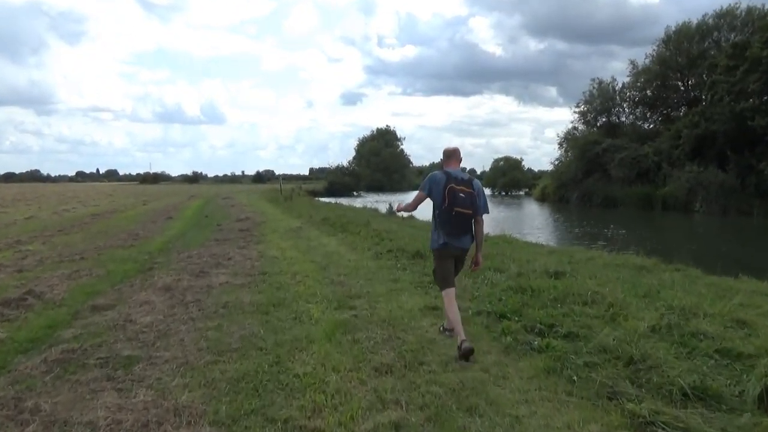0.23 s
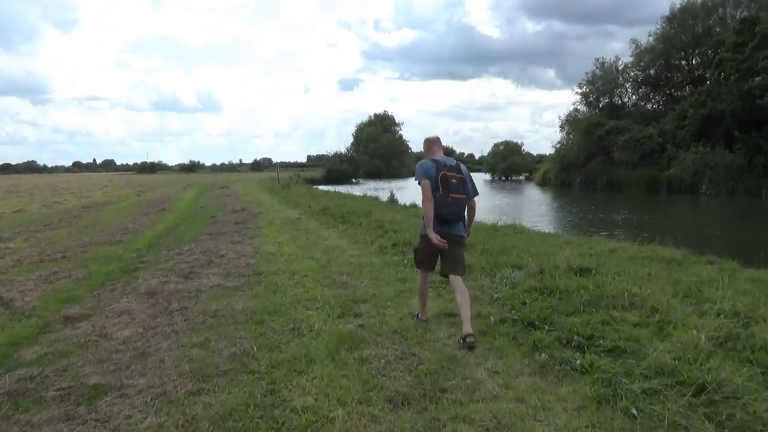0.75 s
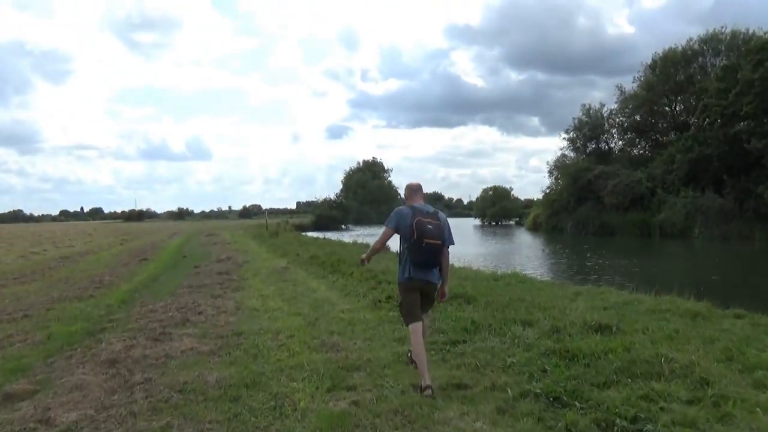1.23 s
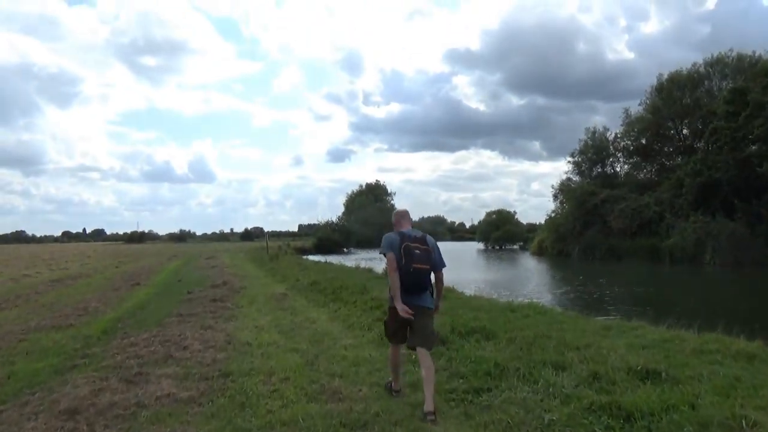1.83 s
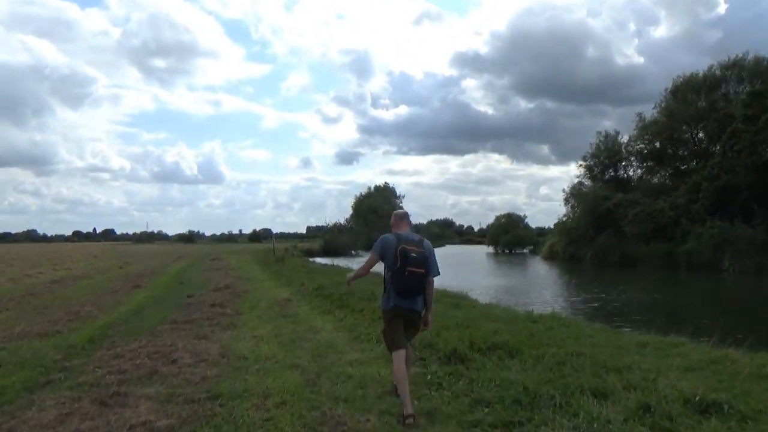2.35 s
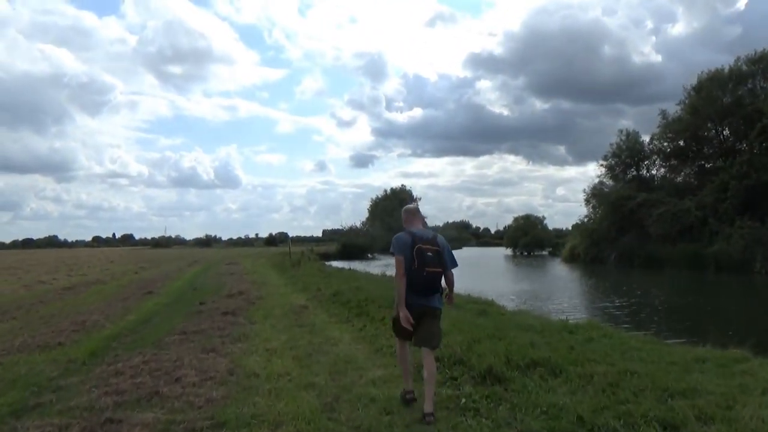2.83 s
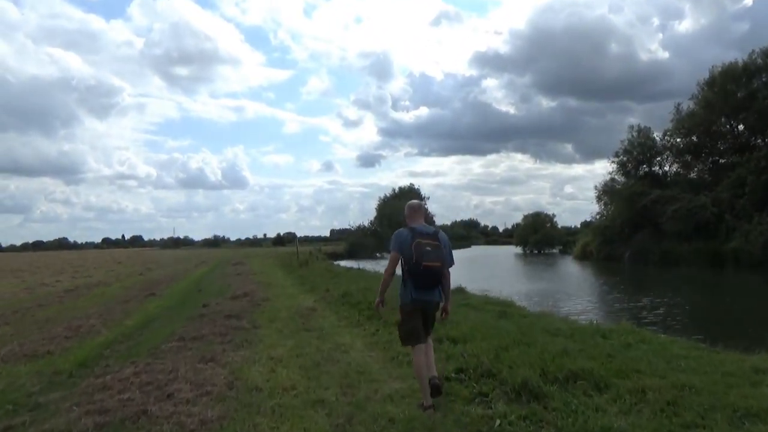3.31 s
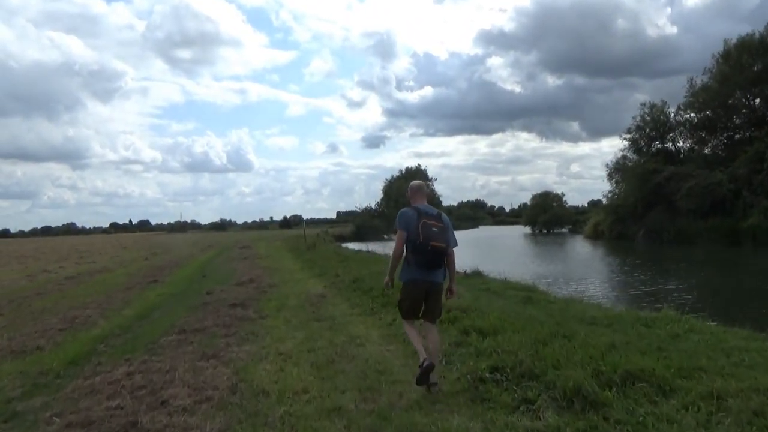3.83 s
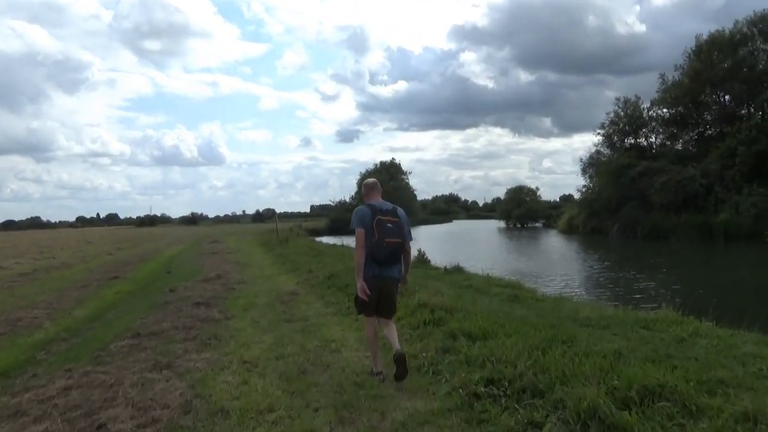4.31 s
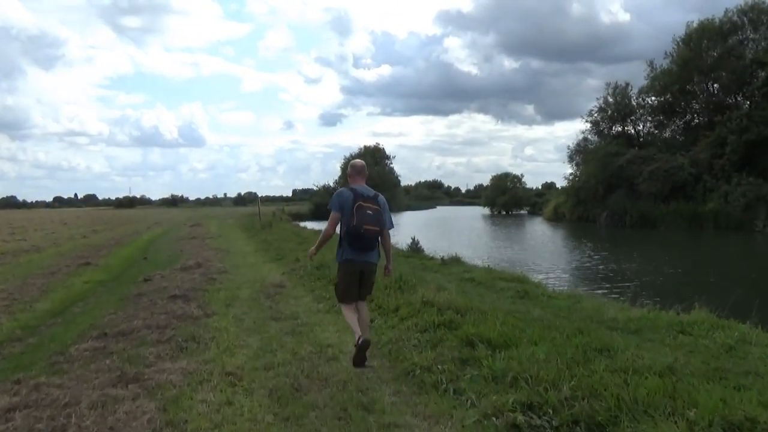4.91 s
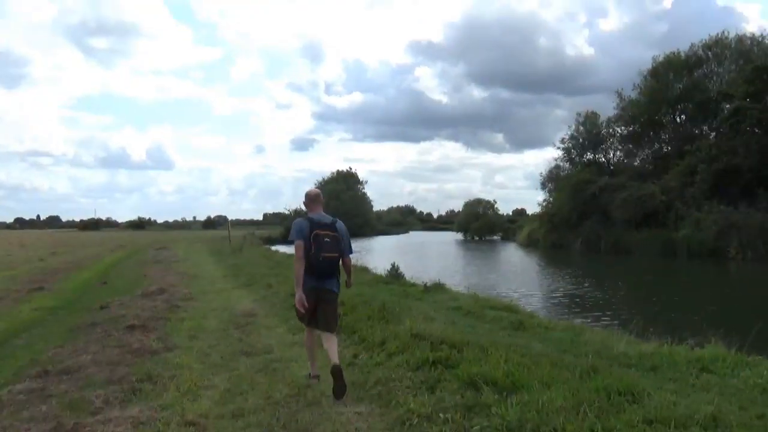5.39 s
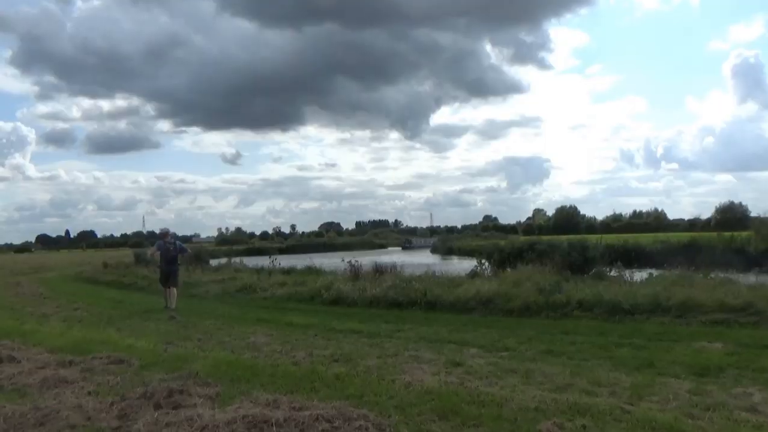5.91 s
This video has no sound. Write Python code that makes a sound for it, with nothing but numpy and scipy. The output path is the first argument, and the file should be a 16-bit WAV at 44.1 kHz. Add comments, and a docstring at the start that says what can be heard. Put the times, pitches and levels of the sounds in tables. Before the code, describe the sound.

Close, steady walking through grass, with soft thuds and dry little cracks, while wind hisses faintly far away.

```python
"""A grassy riverbank, heard from a hand-held camera microphone carried along behind another walker.
Straight below, each leg swing brushes countless blades; tufts whip the shoe, dry stalks snap and soles
thud on the turf. Sandals and gear knock, a strap buckle clacks right by the microphone, and midway there
is one faint, short high squeak. Far off, wind hisses in the trees and over the field. Near the end the
sound dips briefly to silence and returns with a gust buffeting the microphone."""
import sys
import numpy as np
from scipy import signal
from scipy.fft import rfft, irfft, next_fast_len
from scipy.io import wavfile
from scipy.ndimage import uniform_filter1d

SR = 44100
rng = np.random.default_rng(int(sys.argv[2]) if len(sys.argv) > 2 else 0)


def pcm_store(signal):
    """Save signal as 16-bit PCM."""
    levels = np.round(np.clip(np.atleast_2d(signal), -1, 1) * 32767)
    wavfile.write(sys.argv[1], SR, levels.astype(np.int16).T)


N = 271215
TIME = np.arange(N) / SR

# Tone of brushed blades, heard from hand height: frequency_hz, gain_db
BLADE_SPECTRUM = [(200, -44), (1500, -15), (3000, -11.5), (4500, -9), (6000, -6), (7500, -1.5), (9600, 4),
                  (11000, 0), (12500, -6), (14000, -10.5), (16000, -16.5)]
# Leg swings below the microphone: start_s, length_s, level_db, growth_db, stems_relative_db
LEG_SWINGS = [(-.1, 0.13, -34.5, -2.5, -7.5), (0.266, .2, -30, 5, -9.5), (0.617, 0.48, -43, 4, -9),
              (1.328, 0.31, -39.5, 3.5, -18), (1.889, .29, -37.5, -3, -11.5), (2.415, 0.35, -42, -1, -15),
              (3.03, 0.28, -40, -0.5, -12), (3.63, 0.2, -39.5, -4, -15), (4.057, 0.377, -40.5, 4, -16),
              (4.669, 0.28, -38.5, -2.5, -12), (5.213, 0.12, -36, -4, -11.5), (5.406, 0.13, -38, 0, -10),
              (5.775, 0.16, -34.5, 1.5, -11.5), (6.056, .1, -43.5, 0, -2.5)]
SWING_ATTACK_S, SWING_RELEASE_S = 0.034, 0.041
RUSTLE_DB = -48  # grass round the standing foot, between swings


def grass():
    """Blades flick off the shoe; the faster the sweep, the more of them and the smoother the sound."""
    power = undb(RUSTLE_DB) ** 2 + sum(sweep(*swing) ** 2 for *swing, _ in LEG_SWINGS)
    brush = np.sqrt(power) * undb(0.5 * wander(22))
    share = np.clip(0.3 * brush / undb(-37), .02, 1)
    flicks = unit(crackle(share, spread_db=2.1) / np.sqrt(share))  # same power at any density
    rub = undb(-7) * rng.standard_normal(N)
    dry_ticks = undb(-10.5) * crackle(.004, spread_db=2)  # drier blades stand out of the swish
    catching = undb((1.5 - .5 * share) * (wander(70) + 1.04 * wander(300)))
    return unit(colour(flicks + rub + dry_ticks, BLADE_SPECTRUM)) * catching * brush


def sweep(start_s, length_s, level_db, growth_db):
    """How hard a swinging foot brushes the grass: it enters, gains or loses speed, and comes to rest."""
    progress = np.clip((TIME - start_s) / length_s, 0, 1) - .5
    envelope = swell(start_s, length_s, SWING_ATTACK_S, SWING_RELEASE_S)
    return undb(level_db + growth_db * progress) * envelope


# Short high sounds: a faint squeak at 3.435 s, the rest tufts down at the shoe:
# middle_s, level_db, half_length_s, pitch_hz
HIGH_BURSTS = [(0.823, -34, 0.018, 9050), (1.078, -30.5, 0.012, 9400), (1.62, -38.5, 0.016, 9000),
               (1.817, -42, .014, 9500), (2.056, -31.5, 0.02, 9000), (2.38, -42, 0.013, 9500),
               (2.602, -35.5, 0.013, 8400), (3.125, -35, .024, 9050), (3.285, -39, .016, 9200),
               (3.435, -44, .012, 7000), (4.358, -31, 0.014, 9300), (4.773, -27, 0.014, 9700),
               (5.232, -25, 0.0025, 10700), (5.259, -22.5, 0.0047, 8700), (5.487, -34.5, 0.014, 9600),
               (5.915, -30.5, 0.012, 9200)]


def tufts_and_squeak():
    """Bursts of band-passed clicks: bright rasps as tufts let go of the shoe, and one faint squeak."""
    out, clicks = np.zeros(N), crackle(0.39, spread_db=1.5)
    for middle_s, level_db, half_length_s, pitch_hz in HIGH_BURSTS:
        band = unit(resonate(resonate(clicks, pitch_hz, q=0.92), pitch_hz, q=3.0))
        out += band * undb(level_db) * bump(middle_s, half_length_s)
    return out


# Dry stalks snapping underfoot, sharp at this close range: start_s, peak_db
STALK_SNAPS = [(.301, -14), (0.542, -22), (.835, -11), (2.006, -17), (2.051, -14), (2.1312, -10),
               (2.739, -5), (4.133, -12.5), (4.364, -13), (4.750, -11), (5.8666, -9)]


def stalks():
    """A stalk breaks in one crack a fraction of a millisecond long, with a faint tail."""
    out = np.zeros(N)
    for start_s, peak_db in STALK_SNAPS:
        crack = resonate(contact(tail_db=-24, decay_s=0.0012), 9700, q=2.7)
        add(out, start_s, resonate(crack, 8300, q=0.56), peak_db)
    return out


# Tone of stems crushed into the bank: frequency_hz, gain_db
STEM_SPECTRUM = [(80, -36), (200, -1), (370, 1.5), (700, -2), (1100, 0), (1900, 0), (3000, -4),
                 (4500, -5.5), (8000, -7.5), (15000, -32)]
# Heels and soles landing below the microphone: start_s, thud_peak_db, pitch_hz, crunch_db
FOOTSTEPS = [(0.039, -30.5, 540, -48), (.229, -32, 416, -50), (0.286, -33.5, 400, -46),
             (0.454, -29.5, 415, -45), (0.803, -31, 550, -42.5), (1.085, -31.5, 300, -39.5),
             (1.29, -35.5, 400, -46.5), (1.479, -36, 260, -49), (1.62, -41, 498, -42),
             (1.785, -37, 300, -50), (2.049, -44, 600, -40.5), (2.144, -33, 557, -49),
             (2.259, -35.5, 240, -50), (2.377, -31.5, 460, -54), (2.593, -32.5, 374, -42.5),
             (2.742, -34.5, 288, -47), (2.9, -41, 600, -47.5), (3.268, -35, 795, -43.5),
             (3.356, -26.5, 440, -52), (3.69, -38, 528, -46.5), (3.79, -40, 528, -51),
             (4.346, -33, 560, -45.5), (4.388, -31, 670, -55), (4.78, -41.5, 434, -39),
             (5.119, -32.5, 360, -68), (5.432, -37.5, 380.4, -49.5), (5.915, -35, 290, -39.5)]
CRUNCH_BUILD_S, CRUNCH_SETTLE_S = 0.021, 0.026  # stems give before the sole is down, then settle
STANDING_DB = -51  # stems creaking under the standing foot


def turf():
    """Soft ground gives short thuds; matted stems crunch under the weight and clods patter."""
    thuds = np.zeros(N)
    power = undb(STANDING_DB) ** 2
    power += sum((undb(stems_db) * sweep(*swing)) ** 2 for *swing, stems_db in LEG_SWINGS)
    for start_s, peak_db, pitch_hz, crunch_db in FOOTSTEPS:
        thud = resonate(contact(tail_db=-15.5, decay_s=0.007), pitch_hz, q=1.4)
        add(thuds, start_s, resonate(thud, pitch_hz, q=0.84), peak_db)
        press = bump(start_s, np.where(TIME < start_s, CRUNCH_BUILD_S, CRUNCH_SETTLE_S))
        power += (undb(crunch_db) * press) ** 2
    stems = colour(crackle(.25, spread_db=2.5), STEM_SPECTRUM)
    clod_spectrum = [(80, -25), (220, 3), (500, 4), (900, 2), (2000, -10.5), (6000, -40)]
    patter = colour(crackle(.002, spread_db=2.5), clod_spectrum)
    crunch = unit(stems) * np.sqrt(power) * undb(2.17 * wander(120))
    return thuds + crunch + unit(patter) * undb(-53)


# Sandals and carried gear, near the microphone: start_s, peak_db, pitch_hz
GEAR_KNOCKS = [(.002, -19.5, 1030), (.117, -31, 700), (.078, -31, 2500), (0.2248, -26, 1100),
               (.286, -30, 910), (.631, -25, 2750), (0.7877, -24, 1910), (1.014, -31, 700),
               (1.886, -23.5, 2000), (2.619, -26.5, 2900), (2.739, -28.5, 790), (2.962, -28, 1090),
               (3.683, -28, 4600), (4.058, -31, 1500), (5.202, -23, 1850), (5.464, -23, 4800),
               (5.923, -23, 3400)]


def gear():
    """Sandals and gear bump in small dull knocks that die at once."""
    out = np.zeros(N)
    for start_s, peak_db, pitch_hz in GEAR_KNOCKS:
        knock = resonate(contact(tail_db=-17, decay_s=0.0018), pitch_hz, q=1.44)
        add(out, start_s, resonate(knock, pitch_hz, q=0.83), peak_db)
    return out


# Ring of the strap buckle: pitch_hz, relative_db, t60_s
BUCKLE_MODES = [(1000, -3.5, 0.029), (1170, 5, 0.012), (1875, 1.5, 0.013), (2280, 3.5, 0.011),
                (2820, 3.5, 0.011), (3560, -3, 0.009), (5140, -10, .008)]
# Its clack and rebounds, right by the microphone: start_s, relative_db
BUCKLE_HITS = [(5.3753, -18.5), (5.3765, -16), (5.3798, -20.5)]


def buckle():
    """A buckle rings so close that each microphone port hears it in a different phase."""
    ports, t = np.zeros((2, N)), TIME[:4096]
    for port, sign in zip(ports, (-1, 1)):
        ring = np.zeros(len(t))
        for pitch_hz, relative_db, t60_s in BUCKLE_MODES:
            phase = sign * min(pitch_hz / 3600, .6)
            ring += undb(relative_db - 60 * t / t60_s) * np.sin(2 * np.pi * pitch_hz * t + phase)
        for start_s, relative_db in BUCKLE_HITS:
            add(port, start_s, ring, relative_db + 7.5)
    bass_cut = [(60, -18), (400, -5), (900, 0), (8000, 0)]
    return np.array([colour(port, bass_cut) for port in ports])


# Gusts right on the microphone: start_s, length_s, level_db
MIC_GUSTS = [(0.427, 0.037, -46), (3.59, .08, -51), (4.208, 0.055, -52), (4.398, 0.098, -49),
             (4.637, 0.068, -47.5), (4.886, 0.05, -51), (5.315, 0.056, -45.5), (5.46, .15, -50.5),
             (5.995, .17, -28)]
GUST_ATTACK_S, GUST_RELEASE_S, BREEZE_DB = 0.021, 0.033, -63.5


def wind_buffet():
    """Eddies rumble on the microphone ports; a strong gust reaches higher in pitch and sounds wider."""
    wind = undb(BREEZE_DB)
    for start_s, length_s, level_db in MIC_GUSTS:
        wind += undb(level_db) * swell(start_s, length_s, GUST_ATTACK_S, GUST_RELEASE_S)
    strength = np.clip((20 * np.log10(wind) + 50) / 24, 0, 1)
    eddies = []
    for _ in range(2):
        slow = noise([(20, -9.5), (45, -9), (80, -5.5), (150, -21), (400, -39), (2000, -77)])
        fast = noise([(20, -13), (70, 0), (195, -1), (320, -14), (600, -26.5), (3000, -56)])
        eddies.append(np.sqrt(1 - strength) * slow + np.sqrt(strength) * fast)
    mid, side = eddies
    # small eddies are narrower than the gap between the ports
    side = colour(side, [(50, -18), (150, -8), (350, -4)]) * undb(7 * (strength - 0.5))
    return stereo(mid, side) * wind


# Tone of the open air, far beyond the bank: frequency_hz, gain_db
AIR_SPECTRUM = [(15, -9), (30, 3), (60, 4), (170, 0.5), (350, -2.5), (720, 2), (1200, -4.5), (1800, -7.5),
                (3000, -11), (6000, -13), (7500, -9.5), (9500, -8), (11000, -15), (12500, -20),
                (16000, -33)]
# Its stereo width at the microphone: frequency_hz, side_minus_mid_db
AIR_WIDTH = [(40, -33), (130, -24.5), (300, -12.5), (700, -11), (1300, -5.5), (2400, -9), (4500, -22),
             (10000, -37)]
AIR_DB = -47


def open_air():
    """Wind in far trees and over the field: a steady hiss, widest in the midrange."""
    mid = noise(AIR_SPECTRUM)
    side = colour(noise(AIR_SPECTRUM), AIR_WIDTH)
    return stereo(mid, side) * undb(AIR_DB + .5 * wander(2.98))


def undb(db):
    """Decibels to gain."""
    return 10 ** (np.asarray(db) / 20)


def unit(x):
    """Scale to rms 1."""
    return x / np.sqrt(np.mean(x ** 2) + 1e-18)


def stereo(mid, side):
    """Mid and side to left and right."""
    return np.array([mid + side, mid - side])


def colour(x, spectrum):
    """Filter by (frequency_hz, gain_db) points joined on a log frequency axis."""
    size = next_fast_len(len(x))
    frequency_hz, gain_db = np.transpose(spectrum)
    bins_hz = np.fft.rfftfreq(size, 1 / SR)
    gain = undb(np.interp(np.log(bins_hz + 1), np.log(frequency_hz), gain_db))
    return irfft(rfft(x, size) * gain, size)[:len(x)]


def noise(spectrum):
    """Coloured noise at rms 1."""
    return unit(colour(rng.standard_normal(N), spectrum))


def resonate(x, hz, q):
    """A two-pole band-pass."""
    hz = min(hz, .45 * SR)
    return signal.lfilter(*signal.iirpeak(hz, max(q, 2.5 * hz / SR), fs=SR), x)


def wander(rate_hz):
    """Random levels, rate_hz of them a second, smoothed twice; rms 1."""
    hold = max(int(SR / rate_hz), 1)
    steps = np.repeat(rng.standard_normal(N // hold + 1), hold)
    return unit(uniform_filter1d(uniform_filter1d(steps, hold), hold)[:N])


def crackle(share, spread_db):
    """Tiny clicks on a share of all samples: most are weak, a few strong."""
    size = undb(spread_db * np.minimum(rng.exponential(size=N), 5))
    return unit((rng.random(N) < share) * rng.choice([-1, 1], N) * size)


def contact(tail_db, decay_s):
    """A sharp push followed by a short dying scatter."""
    t = TIME[:4096]
    push = undb(tail_db) * rng.standard_normal(len(t)) * np.exp(-t / decay_s)
    push[0] += 1
    return push


def swell(start_s, length_s, attack_s, release_s):
    """Rise, hold until the length is over, die away."""
    t = TIME - start_s
    return np.clip(t / attack_s, 0, 1) * np.exp(-np.maximum(t - length_s, 0) / release_s)


def bump(middle_s, width_s):
    """A bell-shaped envelope."""
    return np.exp(-.5 * ((TIME - middle_s) / width_s) ** 2)


def add(track, start_s, hit, peak_db):
    """Lay a hit into the track at the given peak level."""
    i = max(int(start_s * SR), 0)
    track[i:i + len(hit)] += hit[:N - i] * undb(peak_db) / np.abs(hit).max()


def scene():
    """The feet are straight below the microphone, so they sit in the middle; the air spreads wider."""
    foreground = grass() + tufts_and_squeak() + stalks() + gear() + buckle() + turf()
    return foreground + open_air() + wind_buffet()


# All that the microphone hears dips to silence near the end: time_s, gain
LEVEL_DIP = [(5.925, 1), (5.962, 0.02), (6.004, 0), (6.03, 1)]
TREBLE_LIMIT_HZ = 15900


def record(dry):
    """The level dips briefly, and a steep low-pass cuts the highest treble."""
    gain = np.interp(TIME, *np.transpose(LEVEL_DIP))
    low_pass = signal.ellip(10, .2, 80, TREBLE_LIMIT_HZ, fs=SR, output="sos")
    return signal.sosfilt(low_pass, dry * gain)


dry = scene()
out = record(dry)
pcm_store(out)
```